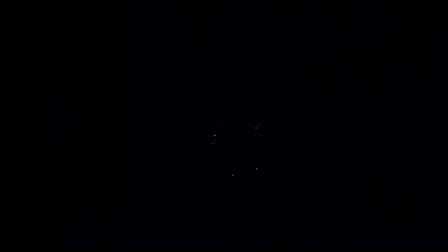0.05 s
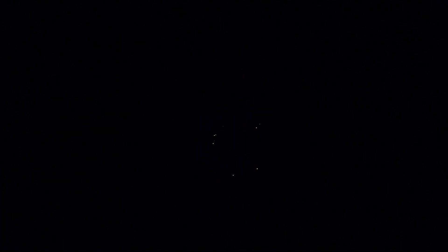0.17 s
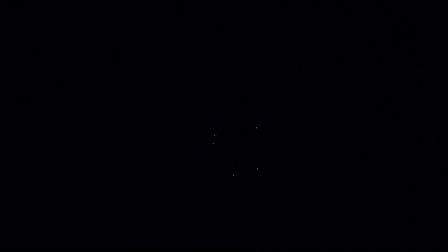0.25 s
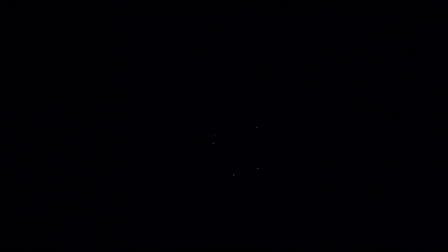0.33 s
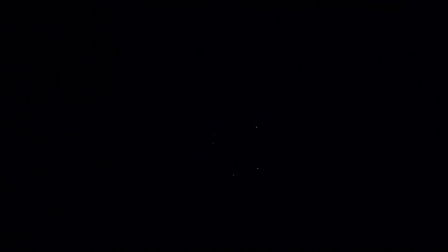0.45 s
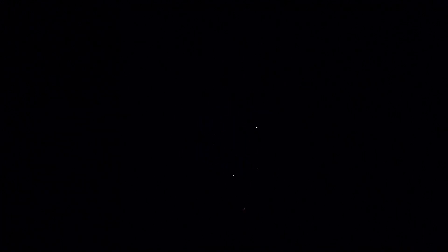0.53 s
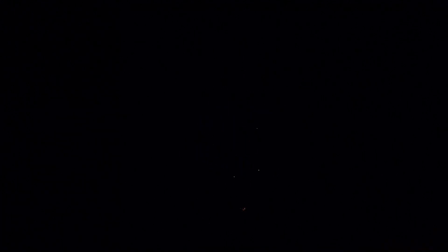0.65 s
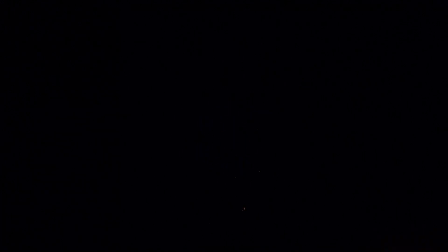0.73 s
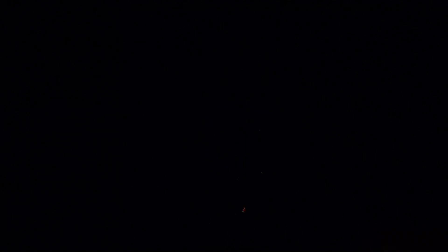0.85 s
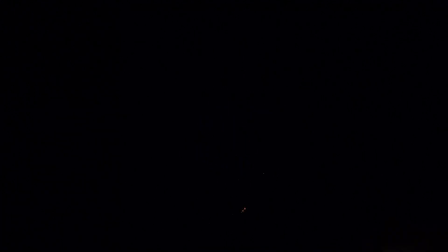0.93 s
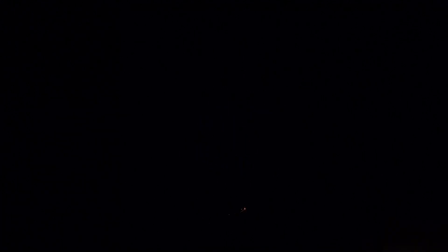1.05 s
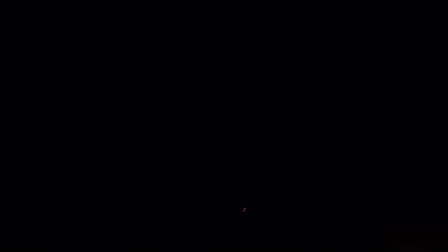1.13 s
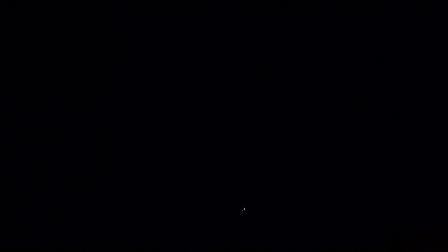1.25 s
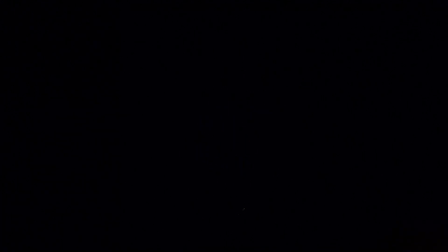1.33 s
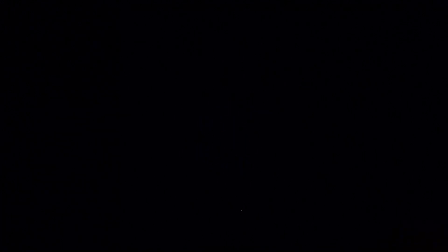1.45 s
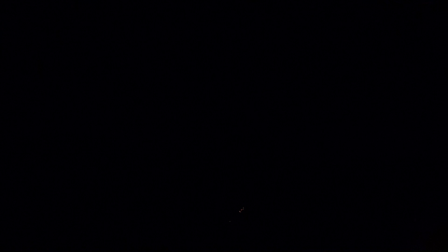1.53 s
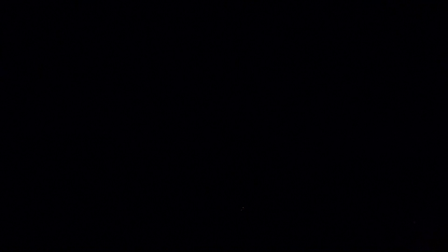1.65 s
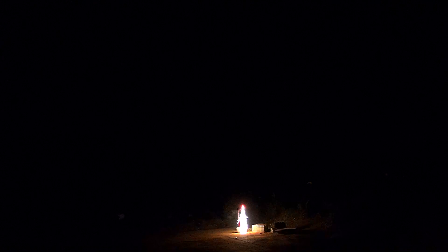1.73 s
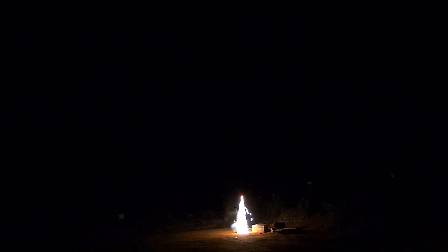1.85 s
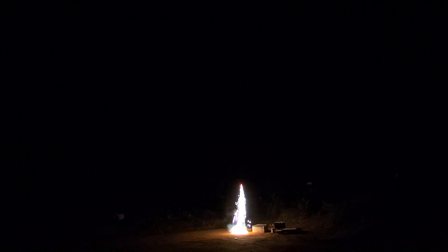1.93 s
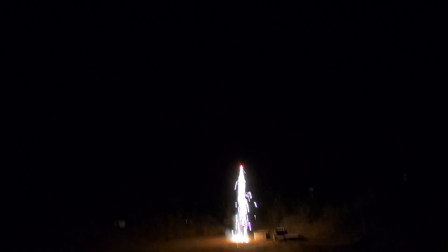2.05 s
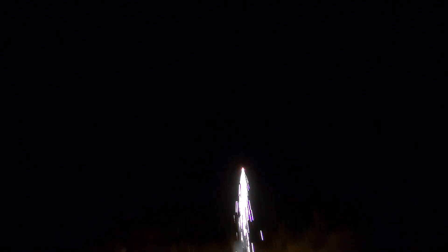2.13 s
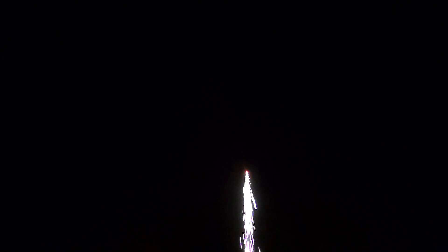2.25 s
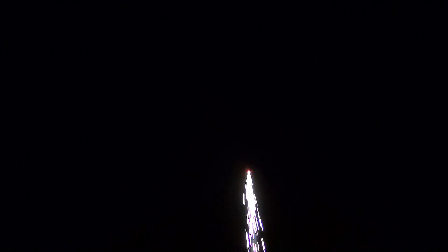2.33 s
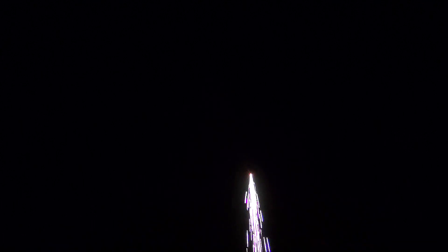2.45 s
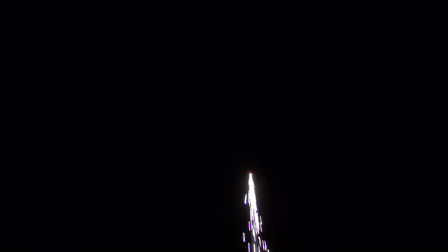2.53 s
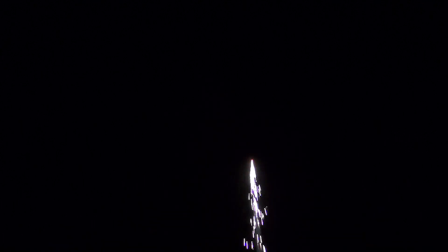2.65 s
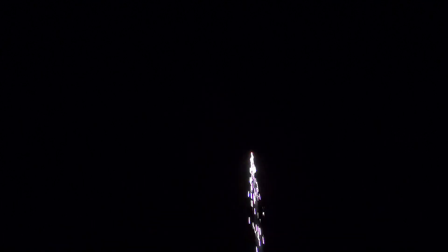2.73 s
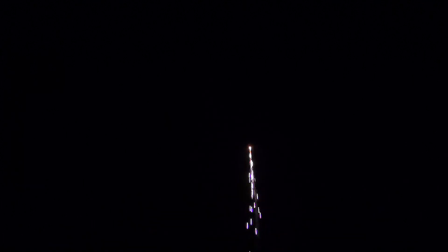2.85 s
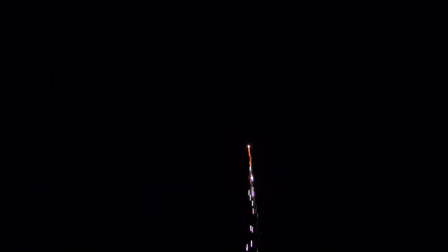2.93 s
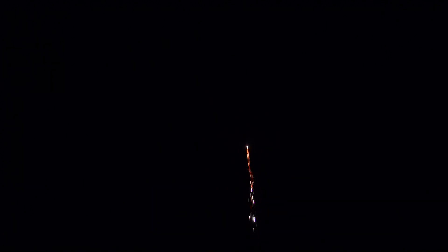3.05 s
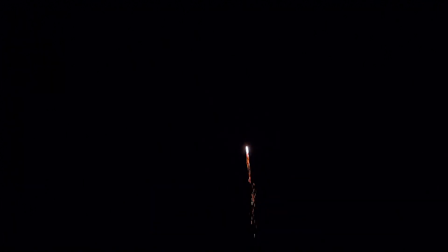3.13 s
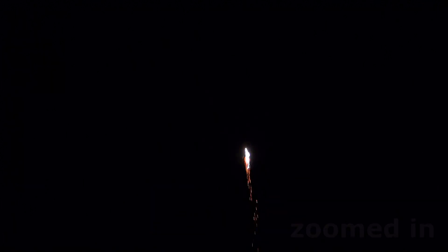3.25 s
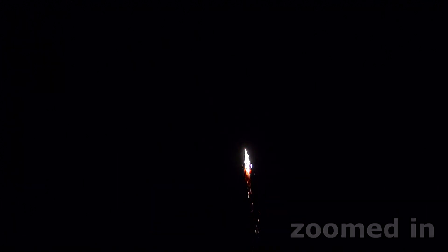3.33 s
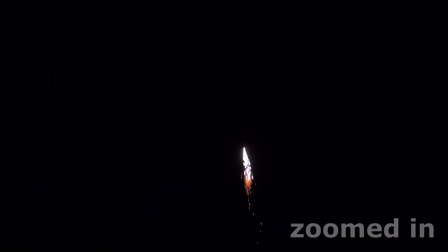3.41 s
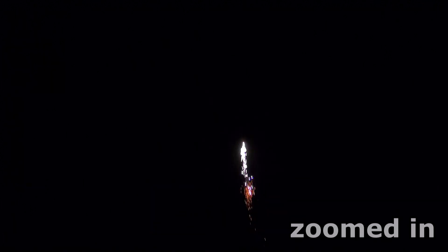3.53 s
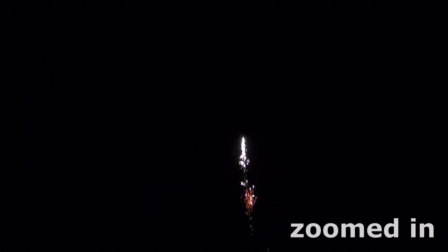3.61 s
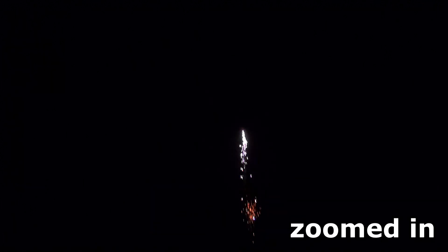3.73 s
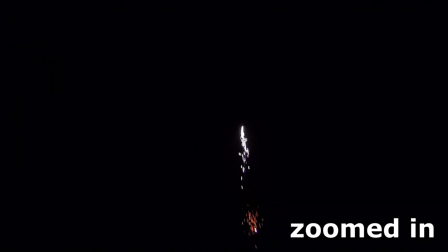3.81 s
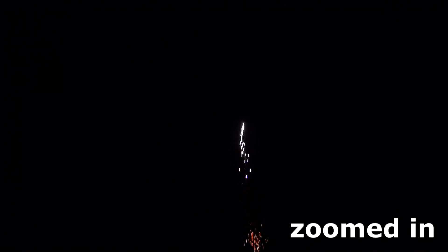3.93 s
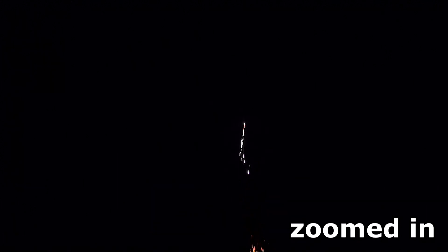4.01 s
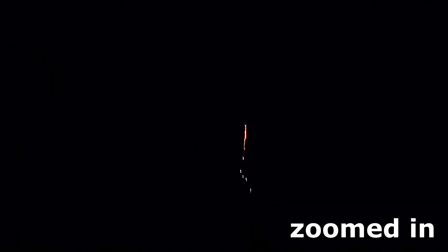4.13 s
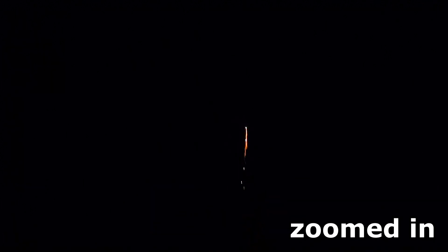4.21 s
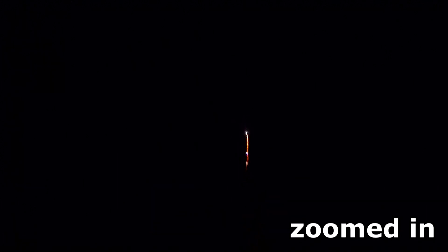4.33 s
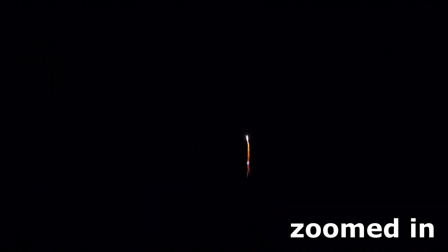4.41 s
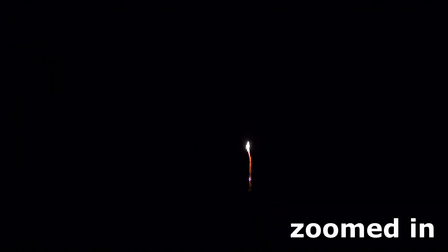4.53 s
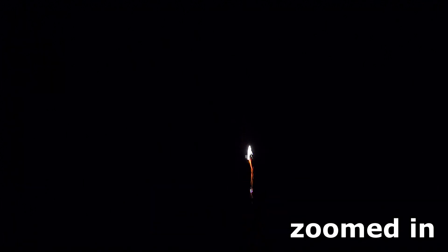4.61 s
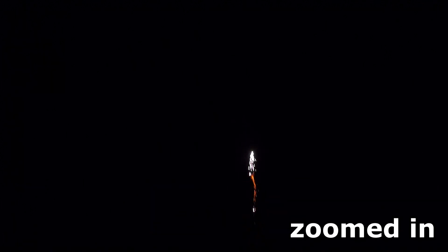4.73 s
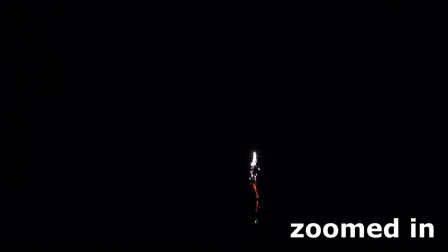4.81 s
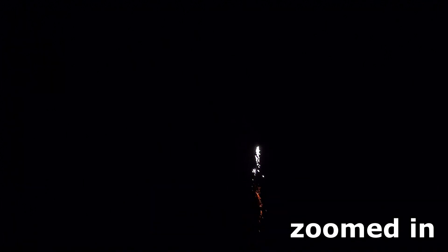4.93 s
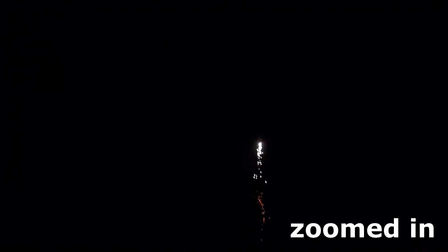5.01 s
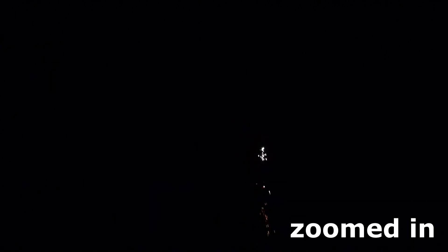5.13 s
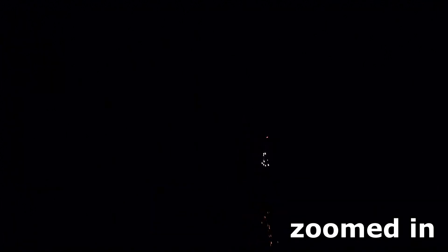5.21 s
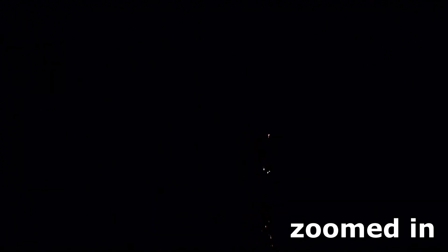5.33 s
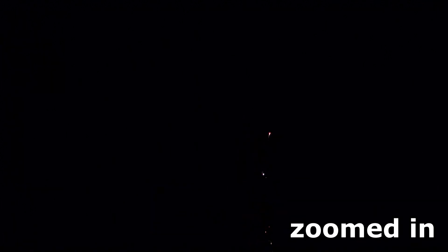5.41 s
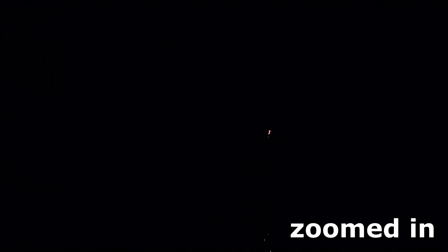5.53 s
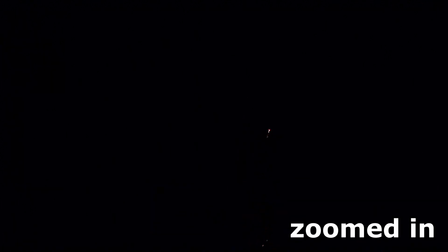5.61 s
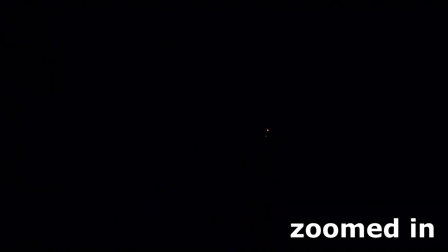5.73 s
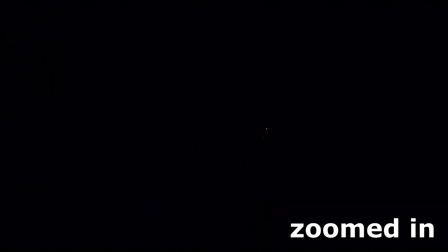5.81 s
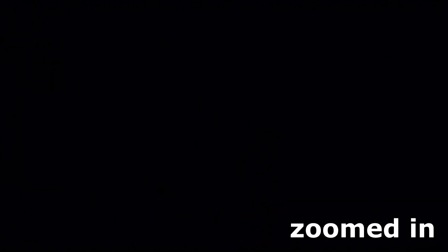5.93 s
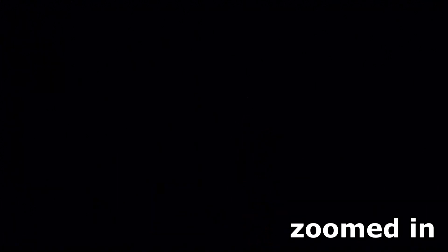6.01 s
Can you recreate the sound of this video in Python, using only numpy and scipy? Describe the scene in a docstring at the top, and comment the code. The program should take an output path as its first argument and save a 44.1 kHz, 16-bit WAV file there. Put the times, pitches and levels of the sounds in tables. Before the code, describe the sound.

Outdoors at night, over a soft far rumble and rush of air, a fuse fizzes and snaps, growing for under two seconds. A small rocket then bursts into a piercing, raspy falling whistle with harsh hiss, followed by two shorter, lower whistles with gaps between. Trees and distant slopes return scattered echoes, and two dull thuds come late. Heard from the ground some twenty metres away, close to centred, in stereo.

```python
"""A small firework rocket at night in open country, over a far rumble and a rush of air.
Its fuse spits, fizzes and flares (filtered noise); then it climbs on three whistling charges (summed partials).
Each whistle falls as the burning tube grows longer, and stutters into half and quarter pitch when the flame is unsteady.
The ground reflects hiss and whistle ever later as the rocket rises, so both sweep and throb; trees and far slopes
answer with scattered noise tails. Two dull thuds come late in the climb."""
import sys
import numpy as np
from scipy import signal
from scipy.fft import rfft, irfft, next_fast_len
from scipy.io import wavfile
from scipy.ndimage import uniform_filter1d, minimum_filter1d, map_coordinates

SR = 44100
rng = np.random.default_rng(int(sys.argv[2]) if len(sys.argv) > 2 else 0)


def output_pcm(signal):
    """Save a mono or channel-first signal as 16-bit PCM at the path in sys.argv[1].

    Samples are clipped to [-1, 1] before scaling.
    """
    pcm = np.clip(np.atleast_2d(signal).T, -1, 1) * 32767
    wavfile.write(sys.argv[1], SR, np.round(pcm).astype(np.int16))


N = 267246
TIME = np.arange(N) / SR
TOP_HZ = 15900


def amp(db):
    """Decibel law: level to amplitude gain."""
    return 10 ** (np.asarray(db) / 20)


def unit(x):
    """Power normalisation: scale to rms 1."""
    return x / np.sqrt(np.mean(x ** 2) + 1e-20)


def along(points, hz):
    """Logarithmic frequency scale: interpolate (frequency [Hz], value) points along it."""
    f, v = np.transpose(points)
    return np.interp(np.log(hz + 1), np.log(f + 1), v)


def curves(rows):
    """Linear interpolation in time: one value per sample for each column after the time."""
    s, *cols = np.transpose(rows)
    return [np.interp(TIME, s, c) for c in cols]


def since(s):
    """Elapsed time: seconds since s, 0 before it."""
    return np.maximum(TIME - s, 0)


def between(start, end, fade=.003):
    """Gating: 1 from start to end, with soft edges."""
    return np.clip(np.minimum(TIME - start, end - TIME) / fade + .5, 0, 1)


def wobble(rate):
    """Random modulation: a smooth curve with rate knots a second."""
    return map_coordinates(rng.standard_normal(int(N * rate / SR) + 4), [TIME * rate])


def filtered(x, response):
    """Linear filtering: multiply the spectrum of x by a response of frequency."""
    m = next_fast_len(N + SR // 2)
    return irfft(rfft(x, m) * response(np.fft.rfftfreq(m, 1 / SR)), m)[..., :N]


# likeness of left and right: (frequency [Hz], correlation [0-1])
LIKENESS = [(100, 0.97), (1500, .99), (4000, 1), (8000, 0.17), (15000, 0.66)]


def rush(spectrum):
    """Interchannel correlation: shaped stereo noise of rms 1, nearly mono up to 4 kHz and wider above."""
    def mid_side_response(hz):
        turn = np.arccos(np.clip(along(LIKENESS, hz), -1, 1)) / 2
        return amp(along(spectrum, hz)) * [np.cos(turn), np.sin(turn)]
    mid, side = filtered(rng.standard_normal((2, N)), mid_side_response)
    return unit(np.array([mid + side, mid - side]))


# far rumble: (time [s], level [dB])
RUMBLE_LEVEL = [(0, -70), (.7, -64), (1.6, -60.5), (2.8, -80), (3.3, -65), (4.5, -64.5), (6.06, -62.5)]
# its spectrum: (frequency [Hz], relative density [dB per Hz])
RUMBLE_COLOUR = [(20, -26.5), (45, -16.5), (80, 2.5), (125, 1), (200, -3), (400, -20), (900, -55.5)]
# open-air rush: (time [s], level [dB])
AIR_LEVEL = [(0, -60), (.4, -57), (.7, -53), (1.1, -58.5), (1.7, -60), (3, -69.5), (4.4, -71),
             (6.06, -67.5)]
# its spectrum: (frequency [Hz], relative density [dB per Hz])
AIR_SPECTRUM = [(60, -18.5), (150, -2.5), (330, -7.5), (620, -2.5), (850, -2.5), (1060, 1), (1500, -15),
                (3000, -19.5), (8000, -24.5), (16000, -34)]


def night():
    """Ambient noise: a far rumble and a soft rush of open air, as two bands with slowly moving levels."""
    rumble_db, = curves(RUMBLE_LEVEL)
    air_db, = curves(AIR_LEVEL)
    rumble = amp(rumble_db + 2.0 * wobble(13)) * rush(RUMBLE_COLOUR)
    return rumble + amp(air_db) * rush(AIR_SPECTRUM)


# fizz of the fuse: (frequency [Hz], relative density [dB per Hz])
FIZZ_COLOUR = [(710, -46.5), (1200, -24), (1520, -6.5), (1750, -16.5), (1980, -1), (2920, -30), (4130, -11),
               (4550, -16), (4860, -30), (5590, -17.5), (8820, -49), (12300, -48.5), (13500, -27),
               (16000, -35)]
# flare of the fuse: (frequency [Hz], relative density [dB per Hz])
FLARE_SPECTRUM = [(40, -30), (200, -10.5), (700, 2), (1100, -13), (2200, 1.5), (3100, -6), (4300, 1),
                  (8000, -13), (16000, -16.5)]
FUSE_CATCH_S, FUSE_GROW_S = .4, 0.41  # the fuse takes hold and builds up
FLARE_S, FLARE_HOLD_S, FLARE_DB, FLARE_T60_S = .705, .062, -36, 0.046  # it flares once
CATCH_DB, CATCH_LEAD_S, CATCH_DB_PER_S = -28.5, 0.011, 1398  # the tube swells just before the first charge lights


def fuse(tube_hz=2090, width_hz=280, tube_db=-48.0, fizz_db=-52, tube_growth_db=30, fizz_growth_db=18):
    """Resonance driven by noise: the fuse fizzes, flares once, and sounds the empty tube as it burns into it."""
    launch_s = CHARGES[0][0]
    young = np.exp(-since(FUSE_CATCH_S) / FUSE_GROW_S)

    def resonance(f):
        return 1j * f * width_hz / (tube_hz ** 2 - f ** 2 + 1j * f * width_hz)
    tube = unit(filtered(rng.standard_normal(N), resonance))
    sputter = amp(1.2 * wobble(5) + 1.5 * wobble(25) + 1.5 * wobble(700))
    ringing = amp(tube_db - tube_growth_db * young) * tube
    fizz = amp(fizz_db - fizz_growth_db * young ** 3) * rush(FIZZ_COLOUR)
    flare_db = FLARE_DB - 60 * since(FLARE_S + FLARE_HOLD_S) / FLARE_T60_S
    crackle = unit(rush(FLARE_SPECTRUM) * amp(3.4 * wobble(600)))
    flare = between(FLARE_S, launch_s) * amp(flare_db) * crackle
    catch = amp(CATCH_DB - CATCH_DB_PER_S * np.maximum(launch_s - CATCH_LEAD_S - TIME, 0)) * tube
    return between(0, launch_s) * (sputter * (ringing + fizz) + flare + catch)


# sparks in the fuse: (time [s], peak level before the common trim [dB], t60 [s])
FUSE_SPARKS = [(0.2673, -53, 0.02), (0.5167, -32.5, 0.023), (0.6039, -39, 0.03), (0.7444, -24.5, 0.017),
               (0.782, -37.5, 0.012), (0.9705, -37.5, 0.012), (0.994, -36.5, 0.015), (1.3791, -29, 0.011),
               (1.408, -34.5, 0.01)]


def sparks(trim_db=-4.0):
    """Impulsive sources with exponential decay: grains of powder snap in the fuse."""
    bursts = sum((TIME >= s) * amp(db + trim_db - 60 * np.abs(TIME - s) / t60) for s, db, t60 in FUSE_SPARKS)
    return bursts * rush([(300, -10), (2000, 10.0), (4200, 0), (8000, -11), (16000, -11.0)])


# reverberation of the trees: (frequency [Hz], t60 [s])
TREE_DECAY = [(200, 0.25), (1500, 0.77), (4000, 0.78), (6500, 0.84), (9000, 0.27), (14000, 0.29)]
# reverberation of the far slopes: (frequency [Hz], t60 [s])
SLOPE_DECAY = [(200, 1), (1600, 3.82), (3200, 2.34), (6500, 1.9), (9000, 0.36)]


def echo(x, decay, onset, apart=0.27):
    """Diffuse scattering: an answer that builds up over onset seconds and dies at its own rate in each band."""
    hz, t, z = signal.stft(rng.standard_normal((2, 2 * SR)), SR, nperseg=256)
    t60 = np.maximum(along(decay, hz), .05)[:, None]
    shape = amp(-60 * t / t60) * (1 - np.exp(-(t / onset) ** 2))
    mid, side = signal.istft(z * shape, SR, nperseg=256)[1]
    tail = np.array([mid + apart * side, mid - apart * side]) / np.linalg.norm(mid)
    return signal.fftconvolve(x[None], tail, axes=1)[:, :N]


# the three charges: (start [s], end [s], pitch [Hz], sag [Hz/s], sharp start [Hz], settling [s],
#                     burn-out rise [Hz], burn-out [s], tone [dB], jet [dB], swell [s], fade [s])
CHARGES = [(1.743, 2.825, 2702, 724, 206, .205, 506, .278, -7.5, -25, .002, .045),
           (3.226, 4.035, 1808, 240, 367, .158, 506, .181, -10, -37, .045, .06),
           (4.574, 5.248, 1529, 190, 250, .063, 0, .01, -11.5, -35.5, .05, .01)]
GASP_HZ, GASP_S = 150, .014  # the last of the flame chirps upward


def tube_pitch(charge):
    """Pipe resonance: a charge starts sharp, sags as the empty tube lengthens, and shoots up as it burns out."""
    start, end, hz, sag, sharp_hz, settle_s, rise_hz, burnout_s = charge[:8]
    age = np.minimum(since(start), end - start)
    spent = np.minimum(since(end - burnout_s) / burnout_s, 1)
    gasp = GASP_HZ * np.exp(-np.maximum(end - TIME, 0) / GASP_S)
    return hz - sag * age + sharp_hz * np.exp(-(age / settle_s) ** 2) + rise_hz * spent ** 2 + gasp


def pressure_db(charge, swell_db, fade_db):
    """Exponential relaxation: a charge swells to full pressure, holds it, and fades as the powder runs out."""
    start, end, *_, swell_s, fade_s = charge
    return -swell_db * np.exp(-since(start) / swell_s) - fade_db * np.exp(-np.maximum(end - TIME, 0) / fade_s)


# spells of unsteady flame: (start [s], end [s], roughness [0-1], period doubling [gain],
#                            period quadrupling [gain], pitch pull [share of pitch])
UNSTEADY_SPELLS = [(1.73, 1.84, .9, 1.25, .2, -.06), (1.84, 1.95, .75, .32, .1, 0),
                   (1.95, 2.06, .9, .42, .5, 0), (2.06, 2.68, .58, .42, .5, 0),
                   (2.68, 2.75, .36, .22, .2, 0), (3.21, 3.27, .3, .45, 0, .02),
                   (3.27, 3.51, .42, .38, .1, 0), (3.928, 3.99, .4, .55, .12, 0),
                   (4.56, 4.662, .38, .5, .18, .055), (5.225, 5.26, .8, 0, 0, 0)]
CALM_ROUGH = .14  # roughness of a steady flame


def flame():
    """Period doubling: roughness, doubling, quadrupling and pitch pull, calm except in the unsteady spells."""
    calm = np.array([CALM_ROUGH, 0, 0, 0])
    spells = sum(np.outer(state - calm, between(start, end, fade=.012))
                 for start, end, *state in UNSTEADY_SPELLS)
    return calm[:, None] + spells


LISTENER_HEIGHT_M, DISTANCE_M, PAD_HEIGHT_M = 1.676, 20, .83
CLIMB_M_PER_S2, SOUND_M_PER_S = 37.2, 343  # the rocket's acceleration; the speed of sound


def off_ground(x, share):
    """Comb filtering by the ground reflection: the teeth close up as the rocket rises, so a gliding tone throbs."""
    height = PAD_HEIGHT_M + .5 * CLIMB_M_PER_S2 * since(CHARGES[0][0]) ** 2
    lag = 2 * LISTENER_HEIGHT_M / SOUND_M_PER_S * height / np.hypot(height, DISTANCE_M)
    return x + share * np.array([np.interp(TIME - lag, TIME, channel) for channel in x])


# jet noise low over the ground: (frequency [Hz], relative density [dB per Hz])
JET_LOW = [(25, -34.5), (90, -11.5), (300, -19.5), (800, -12), (1400, -12.5), (2200, 7), (3000, -4.5),
           (4200, -7), (6000, -20), (8000, -12.5), (10000, -23.5), (13000, -11.5), (16000, -20)]
# jet noise high up: (frequency [Hz], relative density [dB per Hz])
JET_HIGH = [(25, -23), (90, -29.5), (300, -15), (700, -6), (1200, -4.5), (2400, 3.5), (3200, -0.5),
            (4500, -5.5), (7200, -11.5), (9300, -26), (12000, -25), (16000, -29.5)]
JET_SWELL_DB, JET_FADE_DB = 20, 31  # the hiss starts and ends this far under its full level
JET_ROUGH_DB = 8.5  # a fully rough flame hisses this much louder


def jet(charge, spectrum, ground, dull_db):
    """Turbulent jet noise: the exhaust hiss, combed by its reflection off the ground."""
    start, end, *_, jet_db, _, _ = charge
    level_db = jet_db + pressure_db(charge, JET_SWELL_DB, JET_FADE_DB) + JET_ROUGH_DB * flame()[0]
    churn = amp(1.1 * wobble(90) + 1.5 * wobble(1500))
    # dull_db is the loss at TOP_HZ; a negative one brightens
    hiss = filtered(rush(spectrum), lambda f: amp(-dull_db * f / TOP_HZ))
    return between(start, end) * off_ground(amp(level_db) * churn * hiss, ground)


# alternate cycles differ: (multiple of the pitch [-], relative level [dB])
HALF_PARTIALS = [(.5, -10), (1.5, -4.5), (2.5, -15), (3.5, -11.5), (4.5, -16.5), (5.5, -19), (6.5, -20)]
# every fourth cycle differs: (multiple of the pitch [-], relative level [dB])
QUARTER_PARTIALS = [(.25, -18), (.75, -11.5), (1.25, -18.5), (1.75, -15.5), (2.25, -17), (2.75, -22)]
TONE_SWELL_DB, TONE_FADE_DB = 17.5, 18  # the whistle starts and ends this far under its full level
EVEN_FADE = 1  # extra dB that the even overtones lose for each dB of missing pressure


def whistle(charge, overtones, dull_db, doppler):
    """Self-sustained oscillation: the flame pulses at the tube's resonance; doppler scales the pitch."""
    start, end, *_, tone_db, _, _, _ = charge
    rough, doubling, quadrupling, pull = flame()
    hz = tube_pitch(charge) * (1 + pull)
    slack_db = pressure_db(charge, TONE_SWELL_DB, TONE_FADE_DB)
    # the half-pitch partials draw on the same power
    level_db = tone_db + slack_db - 10 * np.log10(1 + 2 * doubling ** 2)
    # an unsteady flame jitters in pitch and strength
    jitter = rough * (.018 * wobble(130) + .035 * wobble(900))
    flutter = amp(rough * (2.8 * wobble(150) + 2 * wobble(800)) - 1.3 * rough ** 2)
    phase = 2 * np.pi * np.cumsum(doppler * hz * (1 + jitter)) / SR
    # the pattern of strong and weak cycles comes in fits and slips now and then
    fits = amp(3.5 * wobble(45) - 1)
    slip = rough * wobble(160)

    def colour(k):
        # a feeble flame loses its top and even overtones
        weak = slack_db * (np.clip(k * hz / 2000 - 3.6, 0, 1.2) + EVEN_FADE * (k % 2 == 0))
        # partials gliding through a fixed resonance near 7 kHz stand out
        return weak + 7 / (1 + ((k * hz - 6800) / 800) ** 2)

    def thin(k):
        # the narrow tube radiates little bass
        return 16 * np.minimum(np.log2(k * hz / 1300), 0)

    def overtone(k, db):
        level = amp(db + colour(k) + 2.0 * min(k - 1, 1) * wobble(25))
        return level * np.sin(k * phase + rng.uniform(0, 2 * np.pi))

    def half(k, db):
        level = amp(db + colour(k) + thin(k) - dull_db * k + 2 * wobble(40))
        return level * np.sin(k * phase + slip + rng.uniform(0, 2 * np.pi))

    def quarter(k, db):
        return amp(db - dull_db * k) * wobble(130) * np.sin(k * phase + slip)

    tone = sum(overtone(k, db) for k, db in overtones)
    halves = sum(half(k, db) for k, db in HALF_PARTIALS)
    quarters = sum(quarter(k, db) for k, db in QUARTER_PARTIALS)
    stutter = fits * (doubling * halves + quadrupling * quarters)
    return between(start, end) * amp(level_db) * flutter * (tone + stutter)


# overtones of the first charge: (multiple of the pitch [-], relative level [dB])
FIRST_OVERTONES = [(1, 0), (2, -15), (3, -29), (4, -32), (5, -32), (6, -32), (7, -35)]
# overtones of the second charge: (multiple of the pitch [-], relative level [dB])
SECOND_OVERTONES = [(1, 0), (2, -12), (3, -30), (4, -30), (5, -38), (6, -43), (7, -42), (8, -44), (9, -45)]
# overtones of the third charge: (multiple of the pitch [-], relative level [dB])
THIRD_OVERTONES = [(1, 0), (2, -10), (3, -26), (4, -29.5), (5, -38), (6, -54), (7, -60), (8, -61), (9, -65),
                   (10, -68)]


def whistles(doppler):
    """Harmonic series: the three whistles, their half and quarter partials duller each time as the rocket climbs."""
    first, second, third = CHARGES
    return np.array([whistle(first, FIRST_OVERTONES, dull_db=0.74, doppler=doppler),
                     whistle(second, SECOND_OVERTONES, dull_db=2.7, doppler=doppler),
                     whistle(third, THIRD_OVERTONES, dull_db=4.2, doppler=doppler)])


# dull thuds: (time [s], level [dB], frequency [Hz], t60 [s], treble fall [dB per octave])
DULL_THUDS = [(4.252, -37, 86.6, 0.13, 21), (5.231, -30.5, 106, 0.095, 6)]


def thuds():
    """Transient low-frequency noise: short pushes of air that rise fast and decay exponentially."""
    out = np.zeros(N)
    for s, db, hz, t60, fall_db in DULL_THUDS:
        age = since(s)
        boom = rush([(hz / 3, -20), (hz, 0), (hz * 2 ** 7, -7 * fall_db)])[0]
        out += amp(db - 60 * age / t60) * (1 - np.exp(-age / 0.0095)) * boom
    return out


def scene():
    """Superposition of direct and reflected sound: the land answers the later charges more strongly."""
    launch = fuse() + sparks()
    first, second, third = CHARGES
    hiss = (jet(first, JET_LOW, ground=0.54, dull_db=6.5)
            + jet(second, JET_HIGH, ground=0.58, dull_db=-3.5)
            + jet(third, JET_HIGH, ground=0.54, dull_db=15.5))
    tones = whistles(doppler=1)
    pan_db = np.array([.7, -1.2, -.9])  # left minus right, per charge
    sway_db = 0.78 * wobble(7)  # moving air shifts the balance a little
    panned = amp([pan_db / 2, -pan_db / 2]) @ off_ground(tones, share=0.51)
    direct = panned * amp([sway_db / 2, -sway_db / 2])
    reach = amp([-5, 1, 2.5])  # how much of each charge gets out to the land
    near = reach @ tones + (launch + hiss).mean(axis=0)
    # the rocket flies away from the listener, so the far land hears it sharper, each patch at its own angle
    far = reach @ whistles(doppler=1.055 + .04 * wobble(70))
    slap = np.interp(TIME - .11, TIME, near)  # one distinct echo off the edge of the trees
    trees = amp(-19.5) * echo(near, TREE_DECAY, onset=0.012) + amp(-23.5) * slap
    slopes = amp(-32.5) * echo(far, SLOPE_DECAY, onset=0.058)
    return launch + direct + hiss + trees + slopes + thuds() + night()


def record(dry):
    """Peak limiting and band limiting: a smoothed gain holds the peaks down; nothing is kept above TOP_HZ."""
    ceiling = .72
    needed = np.minimum(1, ceiling / (np.abs(dry).max(axis=0) + 1e-9))
    gain = uniform_filter1d(minimum_filter1d(needed, size=300), size=200)
    return filtered(dry * gain, lambda hz: hz < TOP_HZ)


dry = scene()
out = record(dry)
output_pcm(out)
```